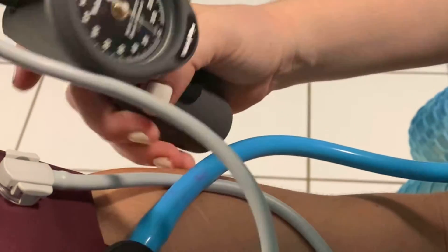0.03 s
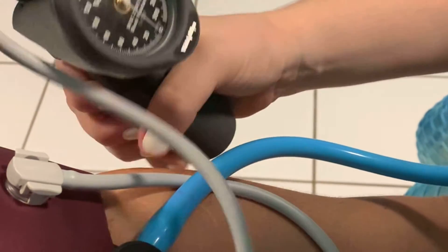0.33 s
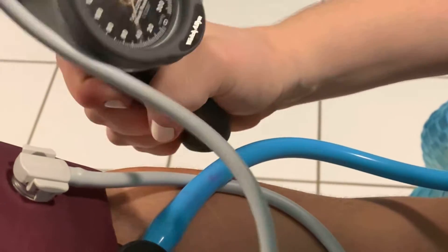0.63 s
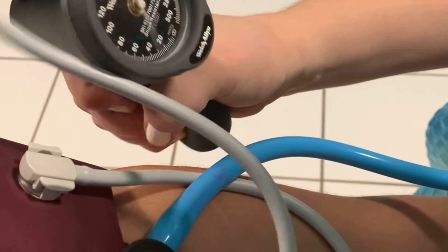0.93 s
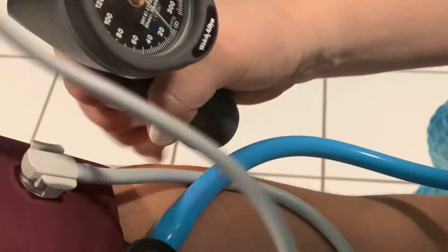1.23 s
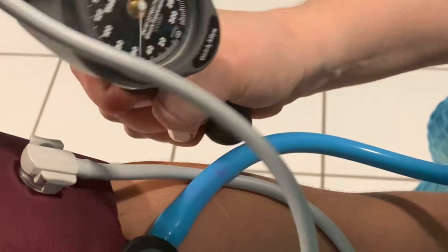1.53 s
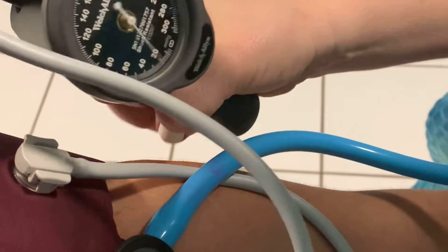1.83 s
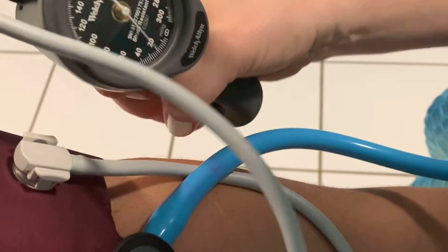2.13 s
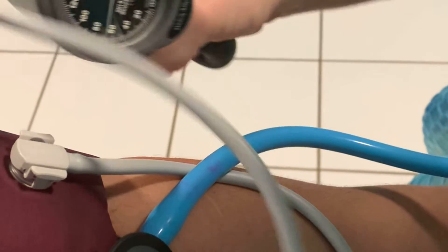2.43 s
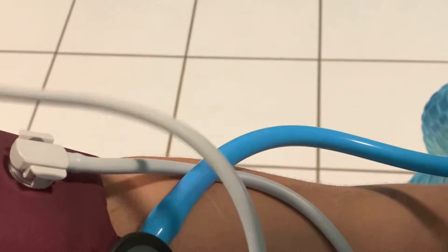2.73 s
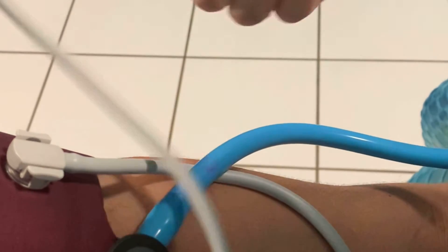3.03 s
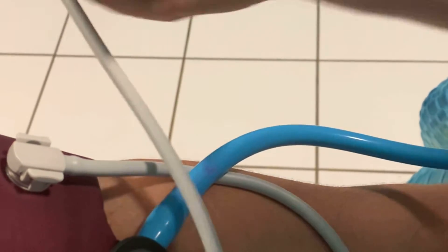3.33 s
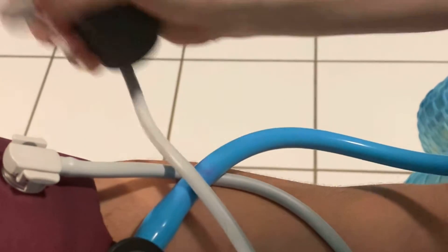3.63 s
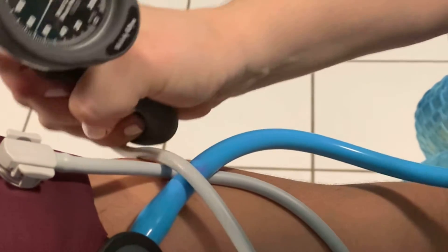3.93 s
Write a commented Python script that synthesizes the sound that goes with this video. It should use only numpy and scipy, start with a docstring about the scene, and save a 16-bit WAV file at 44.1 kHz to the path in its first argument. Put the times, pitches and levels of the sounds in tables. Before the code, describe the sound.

A hand pumps a rubber bulb close by. From about 0.5 to 2.7 seconds, faint squeezes alternate with five bright hissing puffs, roughly half a second apart, among small clicks of valve and fingers. Around 3 seconds one more puff swells with faint sinking whistles. After a lull, a soft squeeze and a few sharp clicks come near 3.9 seconds. Low ventilation hums throughout in the small room.

```python
"""In a small tiled room, a hand pumps the rubber bulb of a blood-pressure gauge near a two-port microphone.
Turbulent flow makes each squeeze a soft hiss in the hose, and each refill a bright puff at the inlet
valve; one refill is slow, with sinking whistles. Contacts of valve, gauge housing and fingers excite
damped modes, heard as clicks. Skin ticks on rubber, the hose rubs once, and ventilation hums throughout."""
import sys
import numpy as np
from scipy import signal
from scipy.fft import rfft, irfft
from scipy.io import wavfile

SR = 44100
rng = np.random.default_rng(int(sys.argv[2]) if len(sys.argv) > 2 else 0)


def wav_record(signal):
    """Record a signal, one row per channel, as 16-bit PCM in the file named by sys.argv[1]."""
    frames = np.transpose(np.atleast_2d(signal))
    bounded = np.clip(frames, -1, 1)
    # unit amplitude maps onto the largest positive 16-bit level
    quanta = np.round(bounded * 32767).astype(np.int16)
    wavfile.write(sys.argv[1], SR, quanta)


N = 176400
T = np.arange(N) / SR
HZ = np.maximum(np.fft.rfftfreq(N, 1 / SR), 1)


def from_db(db):
    """Amplitude grows tenfold for every 20 dB."""
    return 10 ** (np.asarray(db) / 20)


def unit_rms(x):
    """Normalisation to unit mean power."""
    return x / np.sqrt(np.mean(x ** 2) + 1e-20)


def colour(x, spectrum):
    """Linear filtering: each frequency is scaled by a gain curve of (Hz, dB) points."""
    hz, db = np.transpose(spectrum)
    return irfft(rfft(x) * from_db(np.interp(np.log(HZ), np.log(hz), db)), N)


def noise(spectrum):
    """Filtered white noise takes on the spectrum of its filter; unit rms."""
    return unit_rms(colour(rng.standard_normal(N), spectrum))


def drift(rate_hz):
    """Low-passed noise gives a smooth random fluctuation of unit rms."""
    return unit_rms(irfft(rfft(rng.standard_normal(N)) / (1 + (HZ / rate_hz) ** 2) ** 2, N))


def band_noise(hz, width_hz):
    """A randomly driven resonance passes one band of noise; unit rms."""
    return unit_rms(irfft(rfft(rng.standard_normal(N)) / (1 + (2 * (HZ - hz) / width_hz) ** 2), N))


# Hum partials. Each row: frequency in Hz, level in dB, rms pitch wander in Hz.
HUM_PARTIALS = [(50.67, -51.5, 0.56), (56.5, -51, 1.05), (59.52, -41.5, 1), (122.25, -44, .5),
                (152.5, -53, 1.5), (204.5, -59, 1.5), (237.5, -59, 2.06), (591.5, -74, 1.9), (1099, -70, 1)]
# Swell of the partials below 80 Hz. Each row: time in seconds, gain in dB.
BASS_SWELL = [(0, 1.5), (.45, -1), (.8, 2.5), (1.1, 2.5), (1.6, -9), (1.9, 3), (2.3, -2), (2.55, 1),
              (2.7, -5), (2.85, 1.5), (3.55, -1), (3.8, 4.5), (4, 1)]
# Rush of ventilation air. Each row: frequency in Hz, relative spectral density in dB.
RUSH_SPECTRUM = [(25, -26.5), (38, -13), (50, -3), (90, -2), (180, -7.5), (280, -13.5), (400, -15),
                 (520, -23), (750, -26.5), (1100, -26), (1600, -30.5), (2200, -40), (2900, -39.5),
                 (3700, -44.5), (5000, -45.5), (6200, -55), (8200, -57.5), (15000, -61.5)]
RUSH_DB = -46


def ventilation():
    """A line spectrum over a continuous one: wavering hum, a dull rush of air and a thin high hiss."""
    bass_db = np.interp(T, *np.transpose(BASS_SWELL))
    hum = 0
    for hz, db, wander_hz in HUM_PARTIALS:
        level = from_db(db + 0.94 * drift(7.5) + bass_db * (hz < 80))
        cycles = np.cumsum(hz + wander_hz * drift(5.05)) / SR + rng.random()
        hum += np.sqrt(2) * level * np.sin(2 * np.pi * cycles)
    thin_hiss = from_db(-73.3) * band_noise(7040, width_hz=320)
    return hum + from_db(RUSH_DB) * noise(RUSH_SPECTRUM) + thin_hiss


# Part of the rush that differs between the ports. Each row: frequency in Hz, gain in dB.
DIFFUSE_SHARE = [(50, -24), (150, -9.5), (300, -14.5), (550, -1.5), (1100, -1.5), (3000, -9.5), (12000, -6)]


def diffuse_rush():
    """A diffuse field is only partly coherent at two points: some rush arrives in opposite phase."""
    return from_db(RUSH_DB) * colour(noise(RUSH_SPECTRUM), DIFFUSE_SHARE) * np.array([[1], [-1]])


# Colour of skin ticking on rubber. Each row: frequency in Hz, gain in dB.
GRIP_SPECTRUM = [(1000, -21), (3000, 0), (7000, -8.5), (11000, -1), (15000, -3)]


def grip_ticks(per_s=13, decay_s=0.00048):
    """Tiny contacts of skin on rubber form a Poisson process, each a decaying burst of noise."""
    contacts = rng.random(N) < per_s / SR
    impulses = contacts * from_db(-62 + 3.5 * np.minimum(rng.exponential(1, N), 3))
    envelope = signal.lfilter([1], [1, -np.exp(-1 / (decay_s * SR))], impulses + 1e-18)
    return colour(envelope * rng.standard_normal(N) / 2, GRIP_SPECTRUM)


# Contacts of valve, housing and fingers. Each row: start in seconds, peak level in dB,
# ring frequency in Hz, relative ring level in dB, low-pass cutoff in Hz.
CONTACTS = [(0.124, -55.0, 13500, 8, 16000), (0.148, -43.0, 900, 8, 16000),
            (0.199, -40.0, 13500, -2, 13000), (0.57, -23.0, 1100, -11, 2200),
            (0.6406, -20.0, 1700, 8, 4500), (0.9556, -25.0, 1700, -2, 13000),
            (1.018, -33.0, 3800, -2, 13000), (1.367, -33.5, 1700, -8, 2700),
            (1.507, -20.0, 1700, -11, 8000), (1.563, -39.0, 3200, 8, 13000), (1.612, -29.5, 2800, 8, 16000),
            (1.906, -31.0, 2000, -2, 10000), (1.9232, -24.5, 1300, -18, 2200),
            (1.962, -35.0, 2800, 8, 16000), (2.084, -28.0, 6600, 8, 5500), (2.243, -40.5, 11000, 8, 16000),
            (2.357, -35.0, 1700, -11, 6500), (2.405, -35.0, 2000, -18, 2700),
            (2.4117, -42.0, 2400, -14, 2700), (2.4425, -29.5, 3200, 4, 13000),
            (2.463, -30.5, 3200, -2, 10000), (2.5205, -33.0, 2400, -11, 4500),
            (2.539, -22.5, 5200, 8, 3800), (2.64, -28.5, 1300, -11, 16000), (2.774, -42.5, 1700, -8, 4500),
            (2.787, -35.0, 2400, -14, 8000), (3.358, -48.5, 5200, 1, 10000),
            (3.687, -51.0, 6600, -5, 16000), (3.8876, -14.5, 1700, -18, 8000),
            (3.9174, -30.0, 3200, 8, 13000), (3.9492, -27.5, 3200, 1, 13000)]
# Modes of valve and housing. Each row: frequency in Hz, relative level in dB, 60 dB decay time in seconds.
HOUSING_MODES = [(1080, -25, 0.009), (1740, -21, 0.009), (2500, -14, 0.008), (3110, -11, 0.009),
                 (3950, -12, 0.006), (5500, -15, 0.006), (6700, -15, 0.006), (10400, -17, 0.004)]


def clicks(ring_cycles=9, crack_db=5):
    """An impact excites damped modes, its own and the housing's; softer contacts sound duller."""
    out, t = np.zeros(N + SR), T[:SR // 30]
    scatter_db = 2 * rng.standard_normal((len(CONTACTS), len(HOUSING_MODES)))
    for (start, db, hz, ring_db, cutoff_hz), offset_db in zip(CONTACTS, scatter_db):
        ring = np.sin(2 * np.pi * hz * t) * from_db(ring_db - 60 * t * hz / ring_cycles)
        for k, (mode_hz, mode_db, t60) in enumerate(HOUSING_MODES):
            decay = from_db(mode_db + offset_db[k] - 60 * t / t60)
            ring += (-1) ** k * np.sin(2 * np.pi * mode_hz * t) * decay
        ring[0] += from_db(crack_db)
        softness = signal.butter(3, cutoff_hz, fs=SR, output="sos")
        low_cut = signal.butter(2, max(600, .55 * hz), "high", fs=SR, output="sos")
        click = signal.sosfilt(low_cut, signal.sosfilt(softness, ring))
        i = int(start * SR)
        out[i:i + len(t)] += from_db(db) * click / np.abs(click).max()
    return out[:N]


def envelope(stroke, attack_s=0.065, close_s=0.02, tail_db=-13.5, tail_s=0.057, arch_db=0):
    """A stroke builds, swells or sags, then relaxes exponentially: a quick drop and a slower tail."""
    start, length, db, change_db = stroke
    t = T - start
    progress, after = np.clip(t / length, 0, 1), np.maximum(t - length, 0)
    level = from_db(db + change_db * progress + arch_db * np.sin(np.pi * progress))
    tail = from_db(tail_db)
    release = (1 - tail) * np.exp(-after / close_s) + tail * np.exp(-after / tail_s)
    return np.clip(t / attack_s, 0, 1) * level * release


# Reflections off fingers, palm and gauge. Each row: nominal delay in seconds, gain as a ratio.
HAND_ECHOES = [(.00088, 0.39), (.0016, 0.45), (.0027, .36), (.0041, 0.65)]


def hand_comb(x, start=0, stretch_per_s=0):
    """Comb filtering: short echoes ripple the spectrum, and the ripples sink as their paths lengthen."""
    stretch = 1 + stretch_per_s * np.clip(T - start, 0, .3)
    echoes = sum(gain * np.interp(T - delay * rng.uniform(.8, 1.1) * stretch, T, x)
                 for delay, gain in HAND_ECHOES)
    return unit_rms(x + echoes)


def edge_tone():
    """A jet oscillating at a valve's edge whistles faintly in a narrow band."""
    return from_db(-13) * band_noise(10350, width_hz=560)


# Squeezes of the bulb. Each row: start in seconds, length in seconds, level in dB, level change in dB.
SQUEEZE_STROKES = [(0.446, .14, -60, 6.5), (0.902, 0.13, -54, 1), (1.339, 0.16, -55, 1.5),
                   (1.82, 0.13, -57, 1.5), (2.298, 0.15, -57.5, 2.5), (2.71, 0.12, -64, 0),
                   (3.776, 0.18, -63, 8)]
# Hiss in the hose. Each row: frequency in Hz, relative level in dB.
HOSE_SPECTRUM = [(500, -4), (1500, -2), (2800, -3), (3700, -6), (4900, 1), (6400, -2), (7300, -2),
                 (8100, -9.5), (9000, -3), (10500, -4), (12000, -10), (13400, -4), (15600, -12)]


def squeezes():
    """Turbulence in air driven down the hose makes a soft hiss, with a trace of edge tone."""
    jet = hand_comb(noise(HOSE_SPECTRUM)) + edge_tone() / 2
    return jet * sum(envelope(stroke) for stroke in SQUEEZE_STROKES)


# Quick refills. Each row: start in seconds, length in seconds, level in dB, level change in dB.
REFILL_STROKES = [(0.664, 0.145, -41.5, 0.5), (1.114, .155, -35.5, -5), (1.585, .15, -34.5, -6.5),
                  (2.038, .16, -37, -6), (2.512, 0.115, -37, -6)]
# Hiss of the inlet valve. Each row: frequency in Hz, relative level in dB.
INLET_SPECTRUM = [(800, -16.5), (2000, -18), (2800, -14), (3800, -18), (4650, -13), (5400, -16), (6700, -8),
                  (7500, -11.5), (8400, -3), (9200, -1), (9800, -3), (10300, 0), (10900, -6), (11400, -2),
                  (12700, -7), (13700, -3), (14700, -6), (15600, -3)]


def refills(gulp_s=0.048):
    """Suction draws a turbulent jet through the inlet: a lower gulp, then a sizzle when it is wide open."""
    hiss = noise(INLET_SPECTRUM) + edge_tone()
    gulp = from_db(-8) * band_noise(6550, width_hz=1300)
    sizzle = from_db(-8) * band_noise(14700, width_hz=2000)
    out = 0
    for stroke in REFILL_STROKES:
        start, length = stroke[:2]
        t = T - start
        opening = np.sin(np.pi * np.clip(t / length, 0, 1)) ** 2
        jet = hiss + gulp * np.exp(-np.abs(t) / gulp_s) + sizzle * opening
        flow = envelope(stroke, attack_s=0.032, close_s=0.019, tail_db=-12)
        out += hand_comb(jet, start, stretch_per_s=0.041) * flow  # the hand is almost still
    return out


# Hiss of the slow refill. Each row: frequency in Hz, relative level in dB.
SLOW_SPECTRUM = [(800, -22.5), (2800, -22.5), (4000, -18.5), (5000, -21), (7600, -16), (8600, -7),
                 (10000, 0), (11200, -2), (12400, -9), (15600, -8)]
# Its whistles. Each row: starting frequency in Hz, level relative to the hiss in dB.
INLET_WHISTLES = [(7000, -23), (7900, -22), (9900, -14), (10800, -10), (11600, -8), (12400, -12),
                  (14300, -15)]


def slow_refill(start=2.905, sag_per_s=.6, width_hz=220):
    """As the hand lifts away the bulb fills slowly: turbulent hiss swells and narrow-band whistles sink."""
    sag = np.exp(-sag_per_s * np.clip(T - start, 0, .3))
    jet = hand_comb(noise(SLOW_SPECTRUM), start, stretch_per_s=0.59)
    for hz, db in INLET_WHISTLES:
        phase = 2 * np.pi * np.cumsum(hz * sag) / SR
        breathy_tone = drift(width_hz) * np.cos(phase) + drift(width_hz) * np.sin(phase)
        jet += from_db(db) * breathy_tone
    length_s, db, swell_db = 0.1641, -49, 12
    flow = envelope((start, length_s, db, swell_db), attack_s=.008, close_s=.01, tail_db=-21.5, arch_db=3.5)
    return unit_rms(jet) * flow


def hose_rub(start=3.48, length_s=.34, db=-76, swell_db=4.5):
    """Sliding friction of the hose makes a faint, rough band of noise."""
    roughness = from_db(3 * drift(30))
    return band_noise(2860, width_hz=300) * roughness * envelope((start, length_s, db, swell_db))


# Lead of the left microphone port. Each row: frequency in Hz, phase difference in radians.
PORT_PHASE = [(20, 0), (600, -.4), (1000, .5), (1800, .9), (2500, 1.8), (3400, 1.7), (4100, 2.4),
              (4750, 3.2), (5400, 4.1), (6400, 6), (7300, 6.5), (8700, 9.3), (10800, 12.4), (11500, 12.9),
              (13200, 15.7), (14800, 18.6), (16000, 19)]


def ports(x):
    """A path difference is a phase difference: sound reaches the left port just before the right."""
    half_lead = np.exp(.5j * np.interp(HZ, *np.transpose(PORT_PHASE)))
    return irfft(rfft(x) * np.array([half_lead, half_lead.conj()]), N)


def room(x, t60_s=0.16, build_s=0.00081):
    """Reverberation: dense reflections off the tiles decay exponentially, in stereo at unit power gain."""
    t = T[:SR // 2]
    tail = rng.standard_normal((2, len(t))) * from_db(-60 * t / t60_s) * (1 - np.exp(-t / build_s))
    return signal.fftconvolve(x[None], tail / np.sqrt(np.sum(tail ** 2) / 2), axes=1)[:, :N]


def scene():
    """Superposition of the direct sound, the reverberation of bulb and contacts, and the diffuse rush."""
    flutter = from_db(1.2 * drift(120))
    air = squeezes() + (refills() + slow_refill()) * flutter
    contacts = grip_ticks() + clicks() + hose_rub()
    reverberation = room(from_db(-22) * air + from_db(-13.5) * contacts)
    return ports(ventilation() + contacts + air) + reverberation + diffuse_rush()


def record(dry, cutoff_hz=15750, left_db=-0.57):
    """Band limiting and channel imbalance: the top is cut steeply and the left side is slightly weaker."""
    low_pass = signal.ellip(10, .1, 80, cutoff_hz, fs=SR, output="sos")
    return signal.sosfilt(low_pass, dry * np.array([[from_db(left_db)], [1]]))


dry = scene()
out = record(dry)
wav_record(out)
```